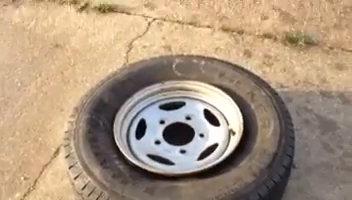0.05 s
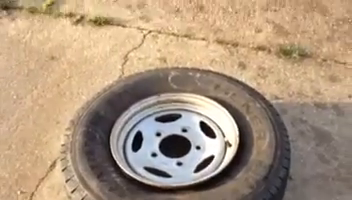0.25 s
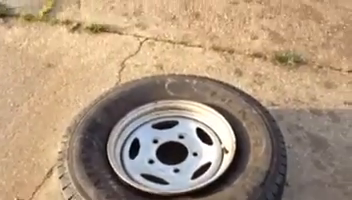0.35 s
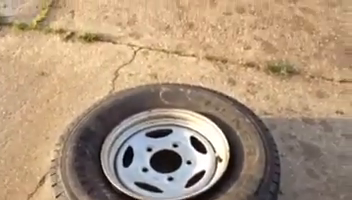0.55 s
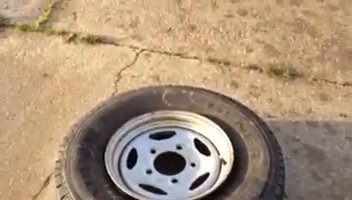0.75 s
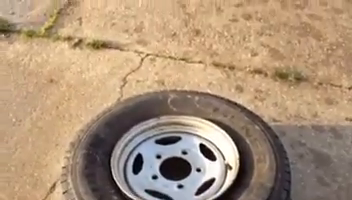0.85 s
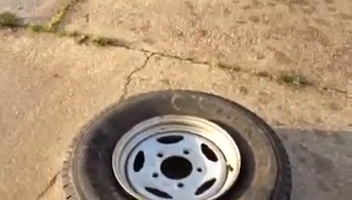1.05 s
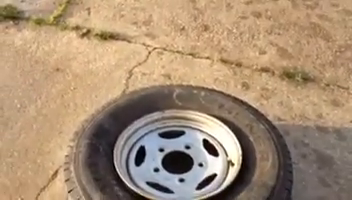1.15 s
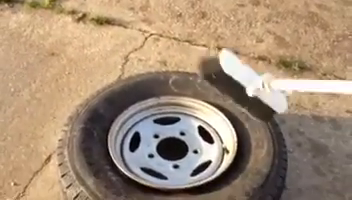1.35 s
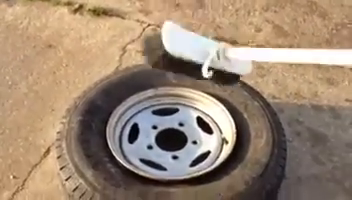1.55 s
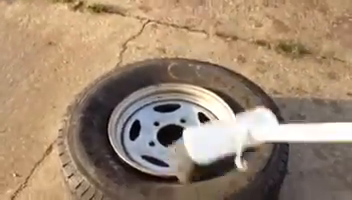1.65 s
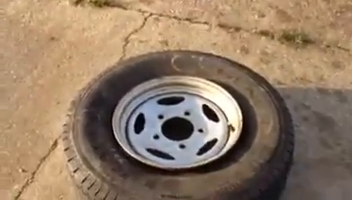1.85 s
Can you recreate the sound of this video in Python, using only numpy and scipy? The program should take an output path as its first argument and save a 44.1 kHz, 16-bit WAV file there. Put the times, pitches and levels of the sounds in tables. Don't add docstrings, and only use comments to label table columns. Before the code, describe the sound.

Sudden loud bang of a tyre on a steel rim outdoors, then small knocks and ticks

```python
import sys
import numpy as np
from scipy import signal
from scipy.fft import rfft, irfft, next_fast_len
from scipy.io import wavfile
from scipy.ndimage import map_coordinates

SR = 44100
rng = np.random.default_rng(int(sys.argv[2]) if len(sys.argv) > 2 else 0)


def voltage_ratio(decibels):
    exponent = np.asarray(decibels, float) / 20
    return 10 ** exponent


def dump_mix(stems):
    frames = np.atleast_2d(stems).T
    limited = np.clip(frames, -1, 1)
    pcm = np.round(limited * 32767).astype(np.int16)
    wavfile.write(sys.argv[1], SR, pcm)


N = 83790


def unit(x):
    return x / np.sqrt(np.mean(x ** 2) + 1e-20)


def along(points, hz):
    f, level = np.transpose(points)
    return np.interp(np.log(hz + 1), np.log(f + 1), level)


def curve(rows):
    s, level = np.transpose(rows)
    return np.interp(np.arange(N) / SR, s, level)


def closed(rows):
    before = (rows[0][0] - .0005, -120)
    after = (rows[-1][0] + .05, -120)
    return voltage_ratio(curve([before] + list(rows) + [after]))


def wobble(rate):
    knots = rng.standard_normal(int(N * rate / SR) + 4)
    return map_coordinates(knots, [np.arange(N) * rate / SR])


def coloured(x, points):
    m = 2 * next_fast_len(len(x))
    gain = np.maximum(voltage_ratio(along(points, np.fft.rfftfreq(m, 1 / SR))), 1e-6)
    cepstrum = irfft(np.log(gain), m)
    cepstrum[1:m // 2] *= 2
    cepstrum[m // 2 + 1:] = 0
    return irfft(rfft(x, m) * np.exp(rfft(cepstrum)), m)[:len(x)]


def noise(points, rough_db, rate):
    lumps = voltage_ratio(rough_db * wobble(rate))
    return unit(coloured(lumps * rng.standard_normal(N), points))


def add(track, s, sound):
    part = track[round(s * SR):][:len(sound)]
    part += sound[:len(part)]


def resonance(f, hz, q):
    damping = 1j * f * hz / q
    return (damping / (hz * hz - f * f + damping)) ** 2


def contacts(rows, colour, rise_s, snap, focus_q, broad_db):
    out, t = np.zeros(N), np.arange(8192) / SR
    f = np.fft.rfftfreq(len(t), 1 / SR)
    for s, db, hz, t60 in rows:
        burst = rng.standard_normal(len(t)) * voltage_ratio(-60 * t / t60) * (1 - np.exp(-t / rise_s))
        burst[0] = snap
        response = voltage_ratio(broad_db) * resonance(f, hz, 0.35) + resonance(f, hz, focus_q)
        burst = irfft(rfft(coloured(burst, colour)) * response, len(t))
        add(out, s, voltage_ratio(db) * burst / np.abs(burst).max())
    return out


def rings(rows, rise_cycles):
    out, t = np.zeros(N), np.arange(SR // 2) / SR
    for s, db, hz, t60 in rows:
        envelope = voltage_ratio(db - 60 * t / t60) * (1 - np.exp(-t * hz / rise_cycles))
        add(out, s, envelope * np.sin(2 * np.pi * hz * t))
    return out


# t/s, level/dB
TRAFFIC_LEVEL = [(0, -66.5), (.3, -62.5), (.7, -64), (1.1, -61), (1.9, -62)]
# f/Hz, level/dB
ROAD_COLOUR = [(150, -21), (250, -9.5), (480, -9.5), (720, -11), (950, -7), (2150, -15), (3500, -25),
               (15800, -35)]
# t/s, level/dB
RUMBLE_LEVEL = [(0.0, -61), (0.148, -60), (0.38, -52), (0.46, -53), (0.698, -65), (0.782, -67.5),
                (1.016, -66), (1.248, -64), (1.65, -64), (1.81, -67), (1.9, -67)]
# f/Hz, level/dB
RUMBLE_COLOUR = [(12, -59.5), (20, -21.5), (54, -10), (91, -5.5), (134, -2.5), (226, -3), (300, -29.5),
                 (390, -58), (660, -120)]


def traffic():
    road_level = voltage_ratio(curve(TRAFFIC_LEVEL) + 2.5 + .6 * wobble(16.15))
    road = road_level * noise(ROAD_COLOUR, rough_db=0.97, rate=45)
    rumble_level = voltage_ratio(curve(RUMBLE_LEVEL) + 1.2 * wobble(8.7))
    return road + rumble_level * noise(RUMBLE_COLOUR, rough_db=2.5, rate=14)


# t/s, level/dB
STROKE_LEVEL = [
    (.86, -71),
    (.877, -56.5),
    (.895, -53.5),
    (.925, -56.5),
    (.94, -77),
    (.96, -82),
]
# t/s, level/dB
RUSTLE_LEVEL = [(0, -74.5), (.95, -80), (1.04, -72), (1.14, -65.5), (1.25, -72.5), (1.5, -73), (1.65, -70),
                (1.7, -72), (1.9, -68.5)]
# f/Hz, level/dB
BRISTLE_COLOUR = [(500, -20.5), (1500, 2.5), (3000, -10), (5000, -8), (7500, -1.5), (11000, -11),
                  (15800, -24)]


def broom():
    level = closed(STROKE_LEVEL) + voltage_ratio(curve(RUSTLE_LEVEL) + 1.5 * wobble(34))
    return level * noise(BRISTLE_COLOUR, rough_db=3, rate=870)


# t/s, peak level/dB, focus f/Hz, t60/s
SMALL_CONTACTS = [(.524, -51, 5000, .07), (.528, -37, 13700, 0.025), (.528, -43, 2200, 0.05),
                  (.523, -50, 13000, .04), (.540, -44, 14000, 0.045), (.593, -45, 900, 0.06),
                  (.594, -44.5, 8000, 0.02), (.638, -51.5, 7700, 0.03), (.526, -44, 800, .08),
                  (.965, -66, 7720, .02), (1.118, -57, 10200, 0.055),
                  (1.4968, -40.5, 6450, 0.034), (1.496, -47, 2340, 0.038), (1.5075, -45, 11000, 0.03),
         (1.509, -44, 14000, .03), (1.4955, -45, 13500, .025), (1.5103, -46.5, 4560, 0.031),
         (1.615, -42.5, 1780, 0.025), (1.6122, -41, 5900, 0.036), (1.622, -44.5, 6000, 0.11),
         (1.6343, -41, 1800, .05), (1.643, -48, 3970, 0.036), (1.704, -50.5, 13500, .012)]
# f/Hz, level/dB
PLASTIC_COLOUR = [(150, -16), (400, 18), (1400, 3.5), (2500, 0.5), (3500, -7.5), (6000, -7.5), (15800, -7)]


def knocks_and_ticks():
    return contacts(SMALL_CONTACTS, PLASTIC_COLOUR, rise_s=0.0009, snap=0, focus_q=2.8, broad_db=-9)


# t/s, peak level/dB, focus f/Hz
CLICKS = [(1.183, -44, 9100), (1.4733, -40, 5160), (1.4735, -40, 8300), (1.4738, -35.5, 12200),
          (1.4764, -41, 6100), (1.536, -46, 5000), (1.541, -46, 5000), (1.6294, -31.5, 7400),
          (1.6337, -40, 6700), (1.636, -35, 6000), (1.6465, -36, 3940), (1.765, -43, 9050),
          (1.783, -55.5, 2000), (1.6438, -35, 10400), (.65, -48, 8500)]
# f/Hz, level/dB
BRITTLE_COLOUR = [(500, -20), (1500, 1), (2500, 7.5), (6000, 2.5), (15800, 1.5)]


def clicks():
    t60_s = .005
    rows = [(*row, t60_s) for row in CLICKS]
    return contacts(rows, BRITTLE_COLOUR, rise_s=0.00035, snap=2.5, focus_q=1.6, broad_db=-9)


# t/s, level/dB, f/Hz, t60/s
PINGS = [(.6471, -25, 3370, .005), (.647, -30, 4500, .004), (.6553, -28, 290, .022),
         (.6555, -20, 700, .005), (.6475, -40, 1000, .01), (.647, -33, 7930, 0.0035),
         (.6555, -16, 1350, .004), (.6555, -22, 2000, .003), (1.2912, -36, 2000, .009),
         (1.33, -45, 1930, .012), (1.4732, -38, 3740, 0.0096), (1.614, -31, 2640, .009),
         (1.6295, -25, 2200, .003), (1.642, -40, 600, .01), (1.6439, -19, 2300, .005),
         (1.6439, -22, 3200, .004), (1.644, -33, 800, .01), (1.612, -40, 500, .015),
         (1.6438, -33, 6500, .004), (1.837, -37.5, 1440, 0.015), (1.8378, -38, 2500, .004),
         (1.8378, -44, 4800, .004), (.529, -41, 1614, 0.055), (.532, -41.5, 1424, 0.056),
         (.594, -45.5, 1527, .04)]


def pings():
    return rings(PINGS, rise_cycles=1.1)


# t/s, level/dB
HISS_LEVEL = [(.2315, -27), (.25, -28.5), (.266, -24.5), (.29, -33.5), (.31, -36.5), (.36, -43),
              (.435, -51.5), (.447, -53), (.5, -99)]
# f/Hz, level/dB
HISS_COLOUR = [(200, -17), (400, -3), (1000, -7.5), (2200, -13.5), (3600, -26), (4900, -23), (8000, -25),
               (15800, -37.5)]
# t/s, level/dB
GRIT_LEVEL = [(.25, -41), (.29, -34.5), (.31, -54), (.36, -50), (.38, -60.5), (.39, -58), (.432, -63),
              (.445, -77), (.48, -81)]
# f/Hz, level/dB
GRIT_COLOUR = [(3800, -34.5), (4500, 2.5), (5500, -5), (8200, 1), (9200, -18.5), (11500, -16.5),
               (13500, -10), (15000, -15)]
# t/s, level/dB
SHUDDER_LEVEL = [(.24, -37), (.29, -41.5), (.37, -38), (.44, -48.5), (.48, -56), (.51, -66)]
# f/Hz, level/dB
RUBBER_COLOUR = [(30, -31.5), (70, -4.5), (115, 0), (200, 3.5), (290, 5), (450, -18.5), (900, -43.5)]


def hiss():
    air = closed(HISS_LEVEL) * noise(HISS_COLOUR, rough_db=1.5, rate=310)
    grit = closed(GRIT_LEVEL) * noise(GRIT_COLOUR, rough_db=2.2, rate=900)
    shudder = closed(SHUDDER_LEVEL) * noise(RUBBER_COLOUR, rough_db=1.0, rate=40)
    return air + grit + shudder


# t/s, peak level/dB, f/Hz, t60/s
BOOMS = [(.237, -20, 395, 0.13), (0.24, -16.5, 200, 0.07), (.265, -22.5, 150, 0.17),
         (.292, -14, 195.4, 0.068), (.322, -24.5, 119.3, 0.33), (0.3498, -19, 195, 0.099),
         (0.382, -24.5, 117.1, 0.15), (.38, -30, 179, 0.092), (0.31, -35, 280, 0.092),
         (0.33, -26, 176, 0.12), (0.463, -42, 133, 0.19), (.543, -43, 190, .06), (0.068, -36.5, 140, 0.1),
         (.968, -39, 135, .07), (1, -38, 140, 0.067), (.51, -42, 140, .08), (0.275, -24.5, 270, 0.13)]


def carcass():
    return rings(BOOMS, rise_cycles=1.6)


# f/Hz, level/dB, t60/s
RIM_MODES = [(4900, -10.5, 0.037), (5860, 9.5, 0.021), (6410, -6.5, .04), (7470, -5.5, 0.041),
             (7800, 4, 0.066), (10800, 4, 0.03)]


def rim(blows):
    rim_db, t60_share, rise_s = -20, .9, 0.00033
    out, t = np.zeros(N), np.arange(SR // 4) / SR
    for s, db, *_ in blows:
        ring = np.zeros(len(t))
        for hz, level, t60 in RIM_MODES:
            strike_db = level + rng.normal(0, 3)
            ring += voltage_ratio(strike_db - 60 * t / (t60 * t60_share)) * np.sin(2 * np.pi * hz * t)
        add(out, s, voltage_ratio(db + rim_db) * ring * (1 - np.exp(-t / rise_s)))
    return out


# t/s, level/dB, f/Hz, t60/s
THUDS = [(.2328, -9, 982, .022), (.2316, -13, 2094, .02), (.232, -13, 1512, .028), (.240, -16.5, 2780, .03),
         (.240, -16, 1400, .03), (.2465, -16.5, 1767, 0.025), (.246, -14, 2614, 0.034),
         (.2525, -15, 1110, 0.053), (.252, -16, 770, .04), (.2628, -6, 840, .02), (.2632, -13, 2050, .02),
         (.272, -22, 1343, 0.043), (.273, -18.5, 2080, .04), (.281, -23.5, 765, 0.043),
         (.284, -26.5, 1907, 0.033), (.32, -26, 730, 0.034), (.3195, -30, 2400, .02),
         (.2312, -8, 5860, 0.01), (.2415, -10.5, 7650, 0.016)]


def thuds():
    return rings(THUDS, rise_cycles=2.07)


# t/s, peak level/dB, focus f/Hz, t60/s
CLATTER = [(.2311, -11, 5900, .012), (.2413, -10, 7600, .013), (.2468, -10, 6500, .03),
           (.2340, -18, 950, .016), (.247, -14, 13800, .03), (.2535, -20, 1000, .02),
           (.2629, -18, 1300, .018), (.2635, -22, 5000, .03), (.2725, -21, 1600, .04),
           (.2722, -21, 14000, .02), (.283, -22, 900, .06), (.3188, -32, 7000, .012), (.321, -26, 900, .03),
           (.351, -30, 1200, .04), (.388, -42, 7000, .03), (.406, -42, 13500, .02), (.2285, -36, 6000, .02),
           (.2465, -23, 3200, .03), (.2312, -18, 10500, .015), (.434, -51, 13500, .02),
           (.2312, -19, 14000, .025)]
# f/Hz, level/dB
SHELL_COLOUR = [(100, -29.5), (200, 4), (900, -2), (2000, -1.5), (4000, -14.5), (8000, -14), (15800, -28)]


def bang():
    clatter = contacts(CLATTER, SHELL_COLOUR, rise_s=0.00083, snap=0, focus_q=1.56, broad_db=-2)
    return clatter + rim(CLATTER[:3]) + thuds()


def yard(x):
    level_db, t60_s = -9.5, 0.064
    t = np.arange(SR // 3) / SR
    tail = rng.standard_normal(len(t)) * voltage_ratio(-60 * t / t60_s)
    return voltage_ratio(level_db) * signal.fftconvolve(x, tail / np.linalg.norm(tail))[:N]


def scene():
    background = traffic() + broom()
    impacts = knocks_and_ticks() + clicks() + bang()
    mix = background + pings() + hiss() + carcass() + impacts + yard(impacts)
    return mix[None]


def low_pass(x):
    return signal.sosfilt(signal.butter(12, 15830, fs=SR, output="sos"), x)


# f/Hz, level/dB
LOW_CUT = [(15, -24.5), (45, -3.5), (90, 2.5)]
# f/Hz, level/dB
MIC = [(2450, -1.5), (2950, -3), (4800, 2.5), (7700, -1), (9200, -2), (11800, -4), (13800, 3.5), (15000, 1)]


def record(dry):
    top_hz = 15400
    band_limit = [(top_hz, -3), (top_hz + 150, -30)]
    heard = coloured(dry[0], [*LOW_CUT, *MIC, *band_limit])
    return low_pass(heard[None])


dry = scene()
out = record(dry)
dump_mix(out)
```